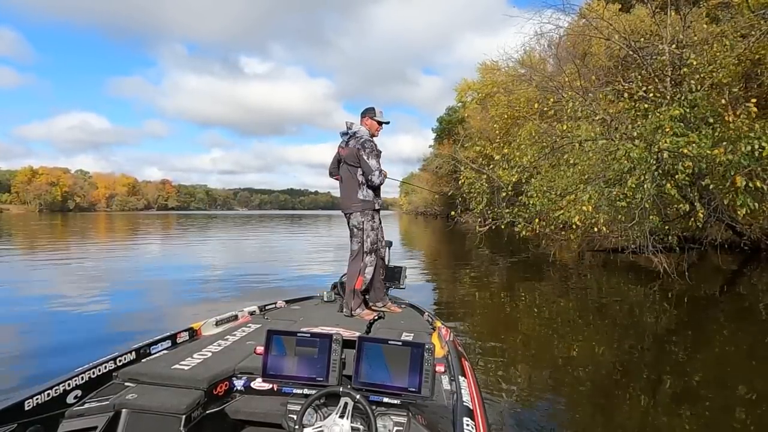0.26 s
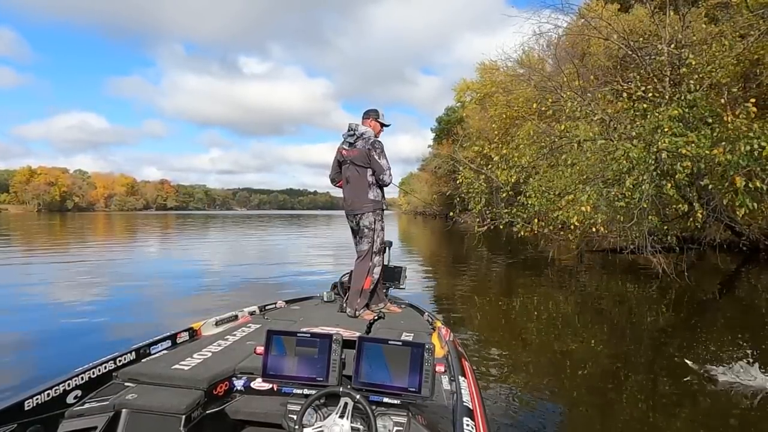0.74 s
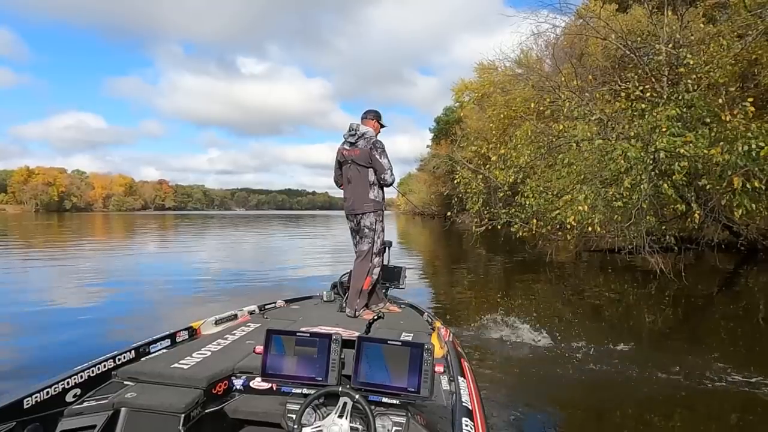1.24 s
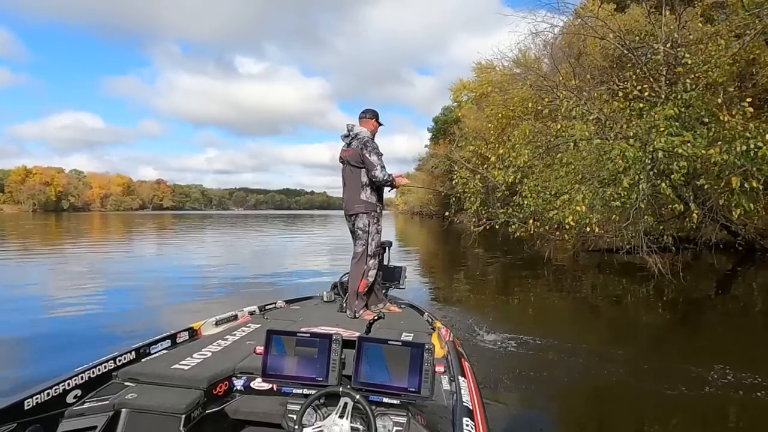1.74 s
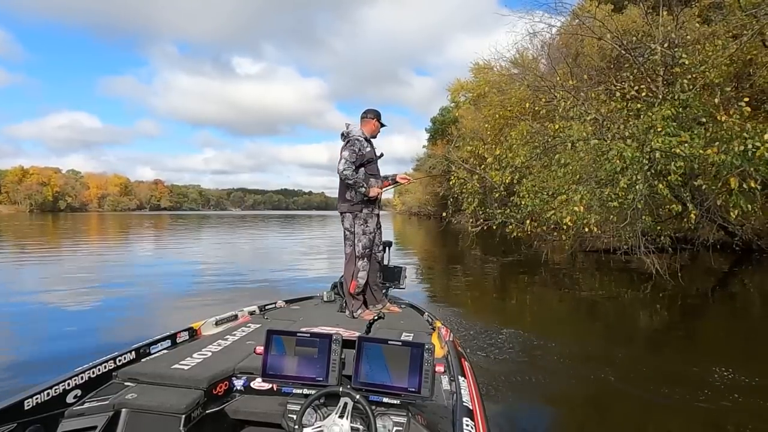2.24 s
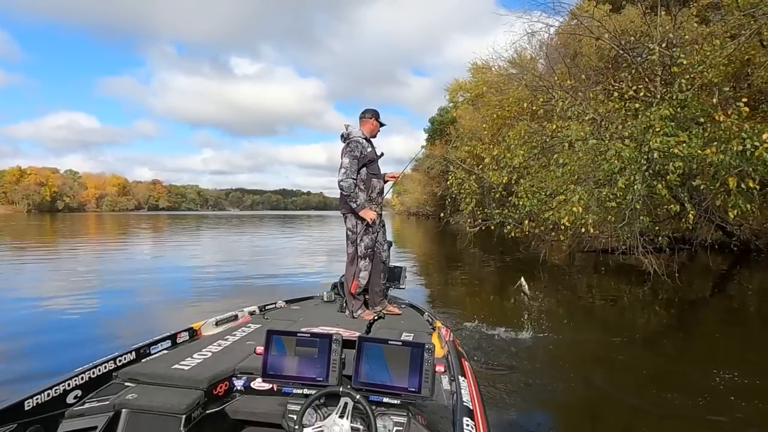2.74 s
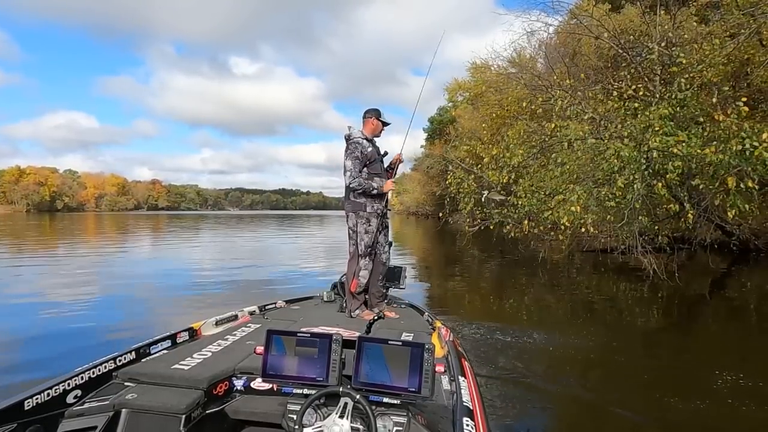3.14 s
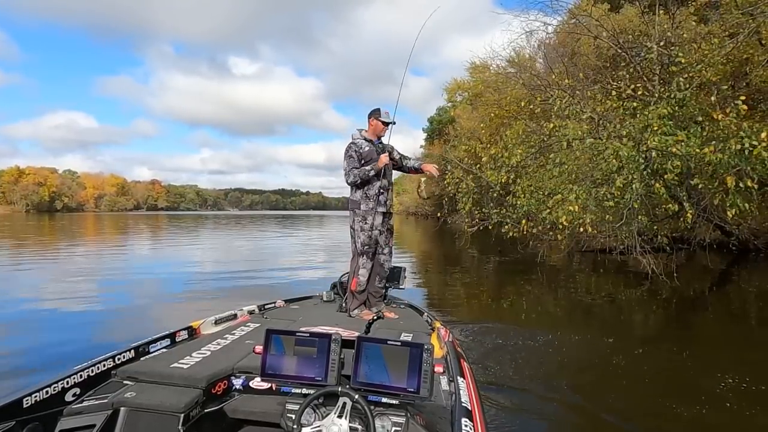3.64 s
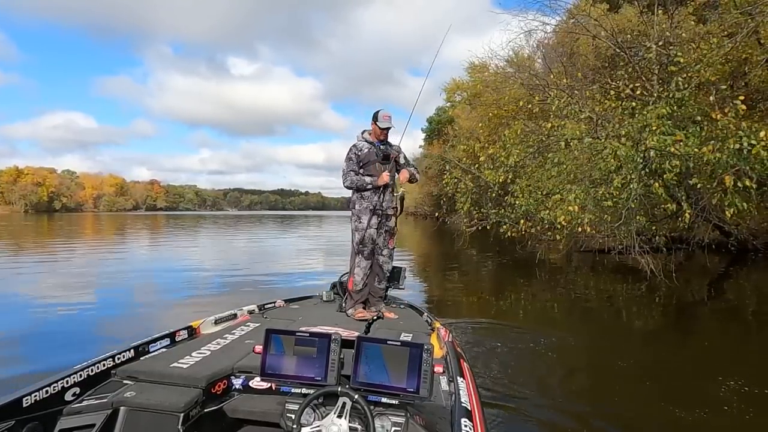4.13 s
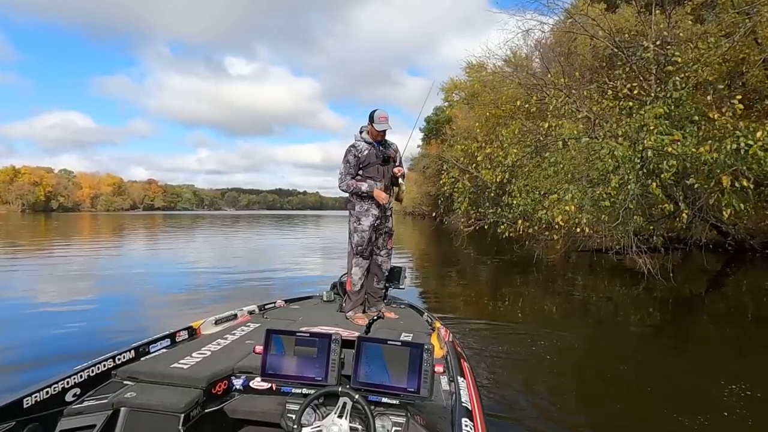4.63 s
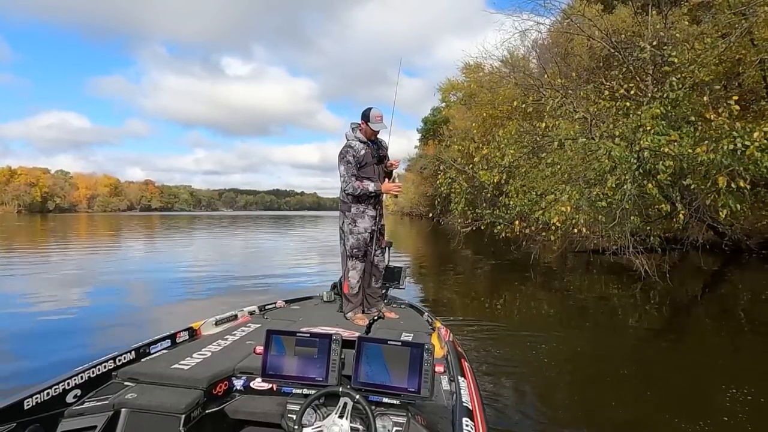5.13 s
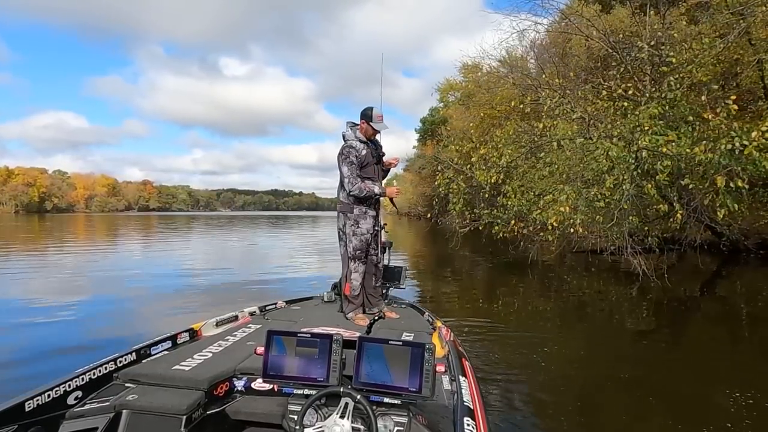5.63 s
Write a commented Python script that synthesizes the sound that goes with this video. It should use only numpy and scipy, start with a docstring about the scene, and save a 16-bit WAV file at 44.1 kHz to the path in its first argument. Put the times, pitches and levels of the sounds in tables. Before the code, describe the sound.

On a calm river, a faint electric motor hum, light low breeze and soft hull wash run throughout. A brief jacket rustle comes first, then a fish thrashes close by in sharp slaps, spray and bubbles, with one hard smack near one second. After a lull it leaves the water with a deep plop; drips, cloth rustle and dry reel clicks follow. Stereo microphone on the boat, open air, no echo.

```python
"""An electric trolling motor hums under a light breeze, with water streaming along a small boat's hull on a river.
A jacket rustles and tackle clicks; then a hooked fish thrashes beside the boat and is swung out with a deep plop.
Motor: two sines. Breeze, wash and cloth: flickering noise bands. Tackle: damped noise knocks and ringing modes.
Water: random grains through narrow bands, plus damped sines for slaps, bubbles, the plop and the rocking hull.
Two microphone ports: splashes shift right, left and slightly right again; the low thumps are well to the left."""
import sys
import numpy as np
from scipy import signal
from scipy.fft import rfft, irfft, next_fast_len
from scipy.io import wavfile

SR = 44100
rng = np.random.default_rng(int(sys.argv[2]) if len(sys.argv) > 2 else 0)


def persist_wave(psi):
    """Save psi, clipped to +-1, as 16-bit WAV."""
    counts = np.round(np.clip(psi, -1, 1) * 32767).astype(np.int16)
    wavfile.write(sys.argv[1], SR, np.atleast_2d(counts).T)


N = 259308
TIME = np.arange(N) / SR   # s

# Trolling motor, rms levels before trim: time_s, throb_db, hum_pitch_hz, hum_db
MOTOR = [(0, -52.5, 161, -49.5), (.45, -55, 165, -52.5), (.75, -41.5, 166, -62), (1.7, -52.5, 165.6, -59.5),
         (3.6, -53.5, 160.5, -54.5), (4.1, -63, 162, -54), (4.55, -50, 163, -54.5),
         (5.88, -45.5, 165, -49.5)]
BLADE_HZ = 80.2   # mean rate of the propeller throb
# Breeze at the microphone, rms before panning: time_s, level_db
BREEZE = [(0, -43), (1.7, -42), (2.4, -43.5), (2.7, -38.5), (3.25, -41), (4, -46.5), (4.4, -41),
          (4.9, -43.5), (5.88, -41.5)]
# Relative spectrum of the breeze: frequency_hz, density_db [dB per Hz]
BREEZE_COLOUR = [(16, -5.5), (28, 2.5), (55, -1), (85, -9), (125, -17.5), (200, -17), (300, -55)]
# Relative spectrum of water streaming along the hull: frequency_hz, density_db [dB per Hz]
WASH_COLOUR = [(120, 2), (220, 3.5), (320, -2), (480, 0.5), (700, -1), (1100, -4.5), (1700, -18.5),
               (3000, -23), (6500, -22), (12000, -30), (15500, -31)]
# Left-right likeness of the wind: frequency_hz, likeness [1 = identical]
WIND_LIKENESS = [(25, .35), (60, .6), (200, .8)]
# Left-right likeness of hull wash and cloth: frequency_hz, likeness [1 = identical]
AIR_LIKENESS = [(200, .93), (1000, .88), (3000, .75), (7000, .65), (12000, .4)]
# Arm moves that rustle the jacket: fastest_s, level_db [before trim], length_s [width at half amplitude]
ARM_MOVES = [(0.259, -51, 0.12), (0.52, -68, 0.35), (3.486, -64.5, 0.94), (3.946, -58.5, 0.037),
             (4.073, -58.5, 0.19), (4.39, -61.5, 0.56), (4.77, -59, 0.11), (5.078, -56.5, .05),
             (5.298, -55.5, 0.25)]
# Relative spectrum of sliding cloth: frequency_hz, density_db [dB per Hz]
RUSTLE_COLOUR = [(700, 8), (1500, 5), (3000, 2), (5500, 0.5), (7500, -10), (9000, -4), (12500, -8.5),
                 (15500, -14)]
# Reel and tackle clicks: start_s, level_db [before trim], pitch_hz [sets the noise band]
CLICKS = [(0.326, -36.5, 3060), (.595, -49, 6200), (1.0299, -18, 5500), (1.039, -28.5, 6130),
          (2.02, -40, 6500), (3.151, -34, 5500), (3.475, -46.5, 7000), (3.669, -36.5, 4000),
          (3.821, -46, 8640), (3.855, -49, 7540), (4.04, -38.5, 4930), (4.067, -37.5, 4900),
          (4.994, -42, 12000), (5.088, -39, 2750), (5.145, -43, 5330), (5.1747, -23.5, 7600),
          (5.2206, -35.5, 3500), (5.265, -30, 5500), (5.276, -32.5, 4500), (5.289, -39, 3000),
          (5.365, -29.5, 10100), (5.413, -27.5, 3160), (5.472, -43, 2950)]
# The reel snaps into gear: start_s, level_db
SNAPS = [(1.0338, -26), (5.176, -15.5)]
# Ringing modes of the reel: pitch_hz, level_db [relative], t60_s
REEL = [(5390, -5, 0.039), (5480, -10.5, 0.038), (5360, -39, 0.49), (5500, -38, 0.38), (6200, -27, 0.021),
        (10300, -25, 0.021), (13360, -31, 0.065)]
# Bubbles and drips: start_s, level_db [before swell and decay], pitch_hz [at the start]
PLOPS = [(0.612, -38.5, 1000), (0.712, -28.5, 540), (0.737, -25, 550), (0.764, -35, 470), (0.820, -31, 393),
         (0.855, -32, 520), (1.203, -22.5, 976), (1.255, -31, 580), (1.345, -25.5, 850),
         (2.068, -34.5, 1840), (2.559, -39, 1510), (2.566, -35, 2700), (2.627, -34, 1114),
         (2.7025, -17.5, 1715), (2.725, -43, 960), (2.746, -21, 395.4), (2.762, -23.5, 431),
         (2.835, -35, 379), (3.202, -26, 3450), (4.066, -23.5, 4300), (4.120, -25.5, 3660),
         (4.121, -32, 2810)]
BUBBLE_CYCLES, BUBBLE_RISE_OCT_PER_S = 41.4, 3.6   # cycles of the starting pitch to fall 60 dB; pitch rise
# Water slapping shut on trapped air:
# start_s, level_db [before trim], pitch_hz, ring_cycles [to fall 60 dB], spatter_db [against the pocket]
SLAPS = [(0.6734, -28.5, 2740, 7.8, -5), (0.683, -26, 1700, 19, -9), (0.6959, -20.5, 1105, 50, -12),
         (.705, -19.5, 1020, 18, -14), (0.7924, -20, 1560, 29, -23), (0.812, -20.5, 580, 9.1, -14),
         (0.851, -24, 1490, 17, -17), (0.9984, -6.5, 1100, 3.6, -17), (1.03, -20.5, 434, 2.5, -20),
         (1.183, -17.5, 1670, 35, -12), (1.213, -23.5, 1900, 12, -14), (1.3363, -24, 1010, 21, -8),
         (1.4044, -18.5, 1910, 7.7, -6), (1.543, -22.5, 1400, 19, -10), (1.583, -16.5, 1620, 12, -10),
         (1.681, -23.5, 1565, 56, -16), (1.7959, -23.5, 910, 14, -9), (1.8174, -19.5, 654, 21, -8.5),
         (1.858, -28, 730, 22, -18), (2.199, -33.5, 880, 6.4, -7), (2.6802, -23, 2020, 26, -12.5),
         (2.6898, -18, 2950, 24, -35), (2.7037, -13.5, 3500, 16, -40), (2.839, -26.5, 1840, 24, -13),
         (2.888, -29, 5500, 38, -23), (2.964, -33, 3720, 33, -12), (3.069, -30, 2010, 17, -15),
         (3.117, -26, 2020, 18, -7), (3.142, -31, 2560, 23, -17)]
# Relative spectrum of falling water: frequency_hz, density_db [dB per Hz]
WATER_COLOUR = [(130, -7), (280, -10), (480, -2), (1100, 3), (1700, 0), (2600, -3), (5200, -6.5),
                (8500, -15), (12000, -12.5), (15500, -19)]
# The fish throws water: start_s, length_s, splash_db, fine_spray_db [both before trim]
THROWS = [(0.703, 0.18, -40.5, -52.5), (0.93, 0.22, -41, -44), (1.133, 0.035, -38, -41),
          (1.183, 0.058, -34.5, -40), (1.344, .03, -41, -56), (1.451, 0.087, -40, -45),
          (1.564, 0.18, -39, -43), (1.776, 0.031, -47, -73), (2.165, 0.012, -56, -68),
          (2.54, 0.23, -53.5, -62), (2.66, 0.036, -36, -51), (2.749, 0.03, -41, -46.5),
          (2.851, 0.14, -44.5, -50), (3.084, 0.045, -72, -55.5)]
# Water gurgles back into the hollow: start_s, length_s, level_db [before trim]
GULPS = [(0.715, 0.15, -40.5), (0.94, 0.097, -53), (1.18, 0.13, -54), (1.32, 0.055, -43.5),
         (1.46, 0.2, -49.5), (1.72, .11, -43.5), (1.9, 0.019, -54), (2.19, 0.011, -44.5),
         (2.705, 0.037, -38), (2.81, 0.073, -47.5)]
SURGE_ATTACK_S, SURGE_FALL_DB_PER_S = 0.011, 127   # every throw and gulp builds, holds, collapses
DRIZZLE_DB, SETTLE_DB = -5, -17   # slower tail against its event: after a throw, after a gulp
TAIL_FALL_DB_PER_S = 38.5
# Drips from line and fish on the river: start_s, end_s
DRIPPING = (1.9, 4.6)
# Line ticking faintly through the rod guides: start_s, end_s
REELING = (1.5, 5.1)
# Low thumps of the plop and of the rocking hull:
# start_s, level_db [before swell and decay], pitch_hz [at the start]
THUMPS = [(2.63, -21.5, 31), (2.737, -8.5, 77), (2.815, -19.5, 93), (3.114, -27.5, 58.6),
          (3.235, -20, 44.7)]
THUMP_CYCLES, THUMP_RISE_OCT_PER_S = 3.6, 1.1   # as for the bubbles
# Bearing of the moving water: time_s, balance_db [left minus right]
BEARING = [(1.9, -3), (2.2, 4), (2.6, -2), (4.1, -.8)]
# Lag of the left port behind the right: frequency_hz, phase_rad
PORT_LAG = [(0, 0), (1400, .26), (3200, .76), (5600, .36), (7800, .6), (8800, 0), (16000, 0)]
CUTOFF_HZ = 15900   # upper limit of the microphone


def from_db(db):
    """Decibels to gain."""
    return np.exp(np.asarray(db) * (np.log(10) / 20))


def rms_one(x):
    """Scale to unit power."""
    return x / np.sqrt(np.mean(x ** 2) + 1e-20)


def in_time(rows):
    """Read the columns of a curve at every sample."""
    s, *columns = np.transpose(rows)
    return [np.interp(TIME, s, column) for column in columns]


def at_hz(points, hz):
    """Read a curve on a log-frequency axis."""
    frequency, value = np.transpose(points)
    return np.interp(np.log(hz), np.log(frequency), value)


def drift(rate_hz):
    """Slow random wander with spread 1: noise through two equal poles, computed every 40 samples."""
    pole = np.exp(-80 * np.pi * rate_hz / SR)
    noise = rng.standard_normal(N // 40 + 2002)
    slow = signal.lfilter([1], [1, -2 * pole, pole * pole], noise)[2000:]   # drop the settling
    return np.interp(np.arange(N) / 40, np.arange(len(slow)), rms_one(slow))


def band(x, low, high):
    """Gentle band-pass between two frequencies in Hz."""
    sos = signal.butter(2, [low, min(high, .47 * SR)], "band", fs=SR, output="sos")
    return signal.sosfilt(sos, x + 1e-18)


def add(out, s, sound):
    """Mix a short sound in at time s."""
    at = int(s * SR)
    out[..., at:at + sound.shape[-1]] += sound[..., :N - at]


def spread(mid, side, alike):
    """Turn two unrelated signals into a stereo pair of given likeness."""
    alike = np.clip(alike, -1, 1)
    return np.sqrt(1 + alike) * mid + np.sqrt(1 - alike) * side * np.array([[1], [-1]])


def place(x, pan_db):
    """Set a sound's bearing by its left-minus-right level at the two ports."""
    left, right = np.broadcast_to(x, (2, N))
    return np.array([left * from_db(pan_db / 2), right * from_db(-pan_db / 2)])


def banded_noise(colour, likeness, flicker_db, flicker_rate_hz, count):
    """Bands of stereo noise, each flickering by itself; rms 1."""
    edges = np.geomspace(colour[0][0], colour[-1][0], count + 1)
    white = rng.standard_normal((2, 2, N))   # neighbouring bands use different noise
    out = 0
    for k, (low, high) in enumerate(zip(edges, edges[1:])):
        hz = np.sqrt(low * high)
        gain = from_db(at_hz(colour, hz) + flicker_db * drift(flicker_rate_hz))
        mid, side = band(white[k % 2], low, high)
        out = out + gain * spread(mid, side, at_hz(likeness, hz))
    return rms_one(out)


def grains(per_s, size_db, count=6000):
    """Random impulses, many small and a few large; rms 1."""
    when, size, sign = rng.random((count, 3))[:int(per_s * N / SR) + 1].T
    strength_db = size_db * np.minimum(-np.log(1 - size), 4)
    out = np.zeros(N)
    out[(when * N).astype(int)] = np.sign(sign - .5) * from_db(strength_db)
    return rms_one(out)


def motor(blade_db, hum_db, waver, flutter_db):
    """The propeller throbs with a wavering pitch under an electric hum; both flutter in level."""
    blade_level, hum_hz, hum_level = in_time(MOTOR)
    throb = np.sin(2 * np.pi * np.cumsum(BLADE_HZ * (1 + waver * drift(6.3))) / SR)
    hum = np.sin(2 * np.pi * np.cumsum(hum_hz) / SR)
    throb_gain = from_db(blade_level + blade_db + flutter_db * drift(6.0))
    hum_gain = from_db(hum_level + hum_db + flutter_db * drift(5.8))
    return np.sqrt(2) * (throb_gain * throb + hum_gain * hum)


def breeze():
    """Wind at the microphone is low, flickering noise that differs between the ports."""
    noise = banded_noise(BREEZE_COLOUR, WIND_LIKENESS, flicker_db=2.0, flicker_rate_hz=5.4, count=8)
    return from_db(in_time(BREEZE)[0]) * noise


def hull_wash():
    """Water streaming along the hull is flickering noise with most of its power below the treble."""
    noise = banded_noise(WASH_COLOUR, AIR_LIKENESS, flicker_db=1.5, flicker_rate_hz=8, count=16)
    return from_db(-55.0) * noise


def jacket(level_db, crinkle_db):
    """Stiff cloth hisses and crinkles as it slides; each arm move swells and fades in a bell shape."""
    hiss = banded_noise(RUSTLE_COLOUR, AIR_LIKENESS, flicker_db=2.5, flicker_rate_hz=27, count=11)
    crinkles = rms_one(band(grains(per_s=300, size_db=4), 1800, 9000))
    power = sum((from_db(db) / (1 + (2 * (TIME - s) / length) ** 2)) ** 2 for s, db, length in ARM_MOVES)
    return from_db(level_db) * np.sqrt(power) * (hiss + from_db(crinkle_db) * crinkles)


def tackle(click_db, click_t60, edge_db, tail_db, tail_t60):
    """Dry plastic clicks are damped noise; the reel's clutch pings with close modes that beat."""
    out, t = np.zeros(N), TIME[:SR // 4]
    decay = from_db(-60 * t / click_t60) + from_db(tail_db - 60 * t / tail_t60)
    for s, db, hz in CLICKS:
        body, edge = rng.standard_normal((2, len(t)))
        body = rms_one(band(body, hz * 0.51, hz * 1.42))
        edge = rms_one(band(edge, 900, 15700))
        add(out, s, from_db(db + click_db) * (body + from_db(edge_db) * edge) * decay)
    ping = sum(np.sin(2 * np.pi * hz * t) * from_db(db - 60 * t / t60) for hz, db, t60 in REEL)
    for s, db in SNAPS:
        add(out, s, from_db(db) * ping)
    return out


def rising_rings(table, cycles, rise_oct_per_s, swell_s):
    """Bubbles and low thumps are sines that swell, die away in a set number of cycles and climb in pitch."""
    out, t = np.zeros(N), TIME[:SR // 4]
    swell = 1 - np.exp(-t / swell_s)
    for s, db, hz in table:
        phase = 2 * np.pi * np.cumsum(hz * 2 ** (rise_oct_per_s * t)) / SR
        add(out, s, np.sin(phase) * swell * from_db(db - 60 * t * hz / cycles))
    return out


def slaps(level_db, spatter_t60, crack_db, crack_t60):
    """A slap is a damped ringing pocket of air, a sharp crack and a short spatter."""
    out, t = np.zeros(N), TIME[:SR // 6]
    for s, db, hz, cycles, spatter_db in SLAPS:
        pocket = np.sin(2 * np.pi * hz * t) * from_db(-60 * t * hz / max(cycles, 1))
        crack, spatter = rng.standard_normal((2, len(t)))
        crack = rms_one(band(crack, 540, 9400)) * from_db(crack_db - 60 * t / crack_t60)
        spatter = rms_one(band(spatter, hz * 0.45, hz * 2.11)) * from_db(spatter_db - 60 * t / spatter_t60)
        add(out, s, from_db(db + level_db) * (pocket + crack + spatter))
    return out


def surges(events, tail_db):
    """Level in dB of moving water: each event builds, holds and collapses over a slower tail, within 1 s."""
    power, t = np.full(N, 1e-12), TIME[:SR]
    for s, length, db in events:
        after = np.maximum(t - length, 0)
        collapse = from_db(-SURGE_FALL_DB_PER_S * after) ** 2
        tail = from_db(tail_db - TAIL_FALL_DB_PER_S * after) ** 2
        build = np.minimum(t / SURGE_ATTACK_S, 1)
        add(power, s, (from_db(db) * build) ** 2 * (collapse + tail))
    return 10 * np.log10(power)


def water_levels():
    """Levels in dB of the large bubbles in the gulps, and of the splash and fine spray of the throws."""
    throws = np.array(THROWS)
    gurgle = surges(GULPS, SETTLE_DB)
    splash = surges(throws[:, [0, 1, 2]], DRIZZLE_DB)
    spray = surges(throws[:, [0, 1, 3]], DRIZZLE_DB)
    return gurgle, splash, spray


def splashing(water_db, drops_per_s, size_db, mist_db, impact_db, clump_db, patchy_db, trims_db, count):
    """Each drop ticks broadly and leaves a bubble ringing in one narrow band; fine mist fills the gaps."""
    edges = np.geomspace(130, 15500, count + 1)
    centres = np.sqrt(edges[:-1] * edges[1:])
    power = from_db(at_hz(WATER_COLOUR, centres)) ** 2 * np.diff(edges)
    zone = np.digitize(centres, [800, 2800])
    # large, middling and small bubbles each follow their own level
    levels = [level + trim - 10 * np.log10(power[zone == k].sum())
              for k, (level, trim) in enumerate(zip(water_db, trims_db))]
    impacts = from_db(impact_db) * grains(500, size_db)   # shared by all bands
    clumps = clump_db * drift(52)
    mist, out = rng.standard_normal((2, 2, N)), 0
    likeness = [(600, .97), (2000, .88), (5000, .9), (8000, .75), (12000, .45)]   # Hz, left-right likeness
    for k, hz in enumerate(centres):
        # blend the three levels smoothly across frequency
        shares = [np.interp(np.log(hz), np.log([520, 1500, 4600]), row) for row in np.eye(3)]
        level = sum(share * db for share, db in zip(shares, levels))
        level = level + clumps + patchy_db * drift(31.0)
        drops = grains(drops_per_s * np.sqrt(hz / 1000), size_db)
        drops = drops + impacts + from_db(mist_db) * mist[k % 2, 0]
        mid, side = band(np.array([drops, mist[k % 2, 1]]), edges[k], edges[k + 1])
        stereo = spread(rms_one(mid), rms_one(side), at_hz(likeness, hz))
        out = out + np.sqrt(power[k] / 2) * from_db(level) * stereo
    return out


def plips(splash_db, per_s, level_db, drip_db, cycles, rise, count):
    """Stray bubbles ring at random pitches, following the splash level; faint drips go on afterwards."""
    out, t = np.zeros(N), TIME[:SR // 20]
    dripping = (TIME > DRIPPING[0]) & (TIME < DRIPPING[1])
    stir = from_db(splash_db + level_db) + from_db(drip_db) * dripping
    for when, size, strength, chance in rng.random((count, 4)):
        if chance < per_s * TIME[-1] / count:
            hz = 850 * 5 ** size
            age = t * hz / cycles   # 1 when the ring has fallen 60 dB
            ring = np.sin(2 * np.pi * hz * t * (1 + rise * np.minimum(age, 1))) * from_db(-60 * age)
            gain = stir[int(when * N)] * from_db(-10 * strength - 3.9 * size)
            add(out, when * TIME[-1], ring * gain)
    return out


def line_ticks(per_s, level_db, range_db, t60, low_hz, count):
    """The line makes faint, bright ticks at random: short damped noise bursts."""
    out, t = np.zeros(N), TIME[:SR // 40]
    start, end = REELING
    draws, bursts = rng.random((count, 3)), rng.standard_normal((count, len(t)))
    for (when, size, chance), burst in zip(draws, bursts):
        if chance < per_s * (end - start) / count:
            tick = rms_one(band(burst, low_hz, 15000)) * from_db(-60 * t / t60)
            add(out, start + when * (end - start), from_db(level_db - range_db * size) * tick)
    return out


def scene():
    """Motor, breeze and wash near centre, angler slightly right, moving splashes, low thumps to the left."""
    hum = motor(blade_db=-.5, hum_db=-1.5, waver=0.0192, flutter_db=2.0)
    surroundings = breeze() + hull_wash() + hum
    rustle = jacket(level_db=2, crinkle_db=-9.5)
    clicks = tackle(click_db=-3.5, click_t60=0.0052, edge_db=-2.5, tail_db=-10, tail_t60=0.047)
    bubbles = rising_rings(PLOPS, BUBBLE_CYCLES, BUBBLE_RISE_OCT_PER_S, swell_s=0.0029)
    hits = slaps(level_db=-3.0, spatter_t60=0.044, crack_db=-23, crack_t60=0.0099)
    gurgle, splash, spray = water_levels()
    water = splashing((gurgle, splash, spray), drops_per_s=140, size_db=3.5, mist_db=-1.5, impact_db=-1.5,
                      clump_db=2.0, patchy_db=2.0, trims_db=(-2.5, -2.36, 0.5), count=24)
    strays = plips(splash, per_s=70, level_db=6.5, drip_db=-59, cycles=31, rise=0.092, count=700)
    ticks = line_ticks(per_s=12, level_db=-47.5, range_db=9, t60=0.0092, low_hz=3980, count=120)
    thumps = rising_rings(THUMPS, THUMP_CYCLES, THUMP_RISE_OCT_PER_S, swell_s=0.0064)
    fish = place(water + hits + bubbles + strays, in_time(BEARING)[0])
    angler = place(clicks + ticks + rustle, pan_db=-1.1)
    return fish + place(thumps, pan_db=7.5) + angler + place(surroundings, pan_db=0.6)


def record(dry):
    """The left port lags in phase by frequency; the treble is shelved down, rolls off and stops at a cutoff."""
    size = next_fast_len(N + SR // 10)
    lag = np.interp(np.fft.rfftfreq(size, 1 / SR), *np.transpose(PORT_LAG))
    left = irfft(rfft(dry[0], size) * np.exp(-1j * lag), size)[:N]
    ports = np.array([left, dry[1]])
    low = signal.sosfilt(signal.butter(13, 7500, fs=SR, output="sos"), ports)
    high = signal.sosfilt(signal.butter(13, 7500, "high", fs=SR, output="sos"), ports)
    shelved = low + from_db(-8.5) * high
    rolled = signal.sosfilt(signal.butter(6, 12700, fs=SR, output="sos"), shelved)
    return signal.sosfilt(signal.ellip(10, .1, 80, CUTOFF_HZ, fs=SR, output="sos"), rolled)


dry = scene()
out = record(dry)
persist_wave(out)
```